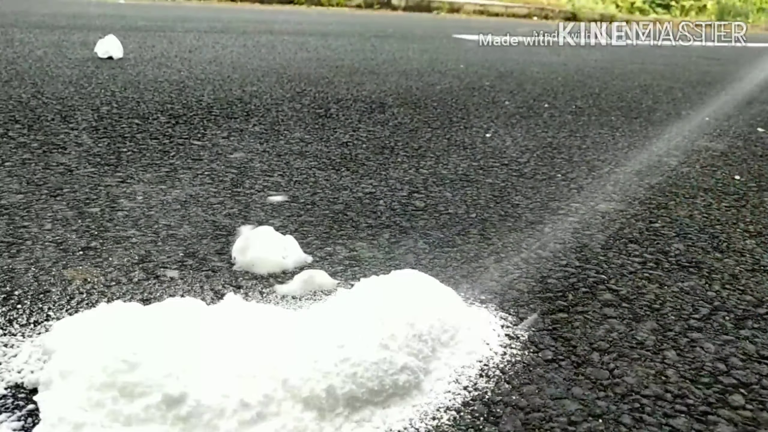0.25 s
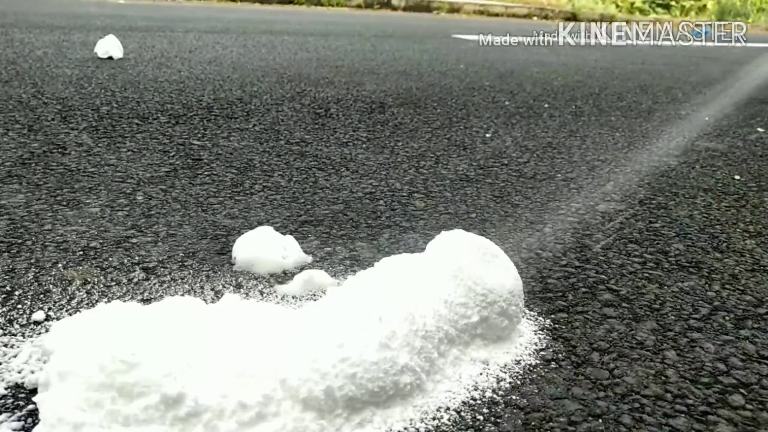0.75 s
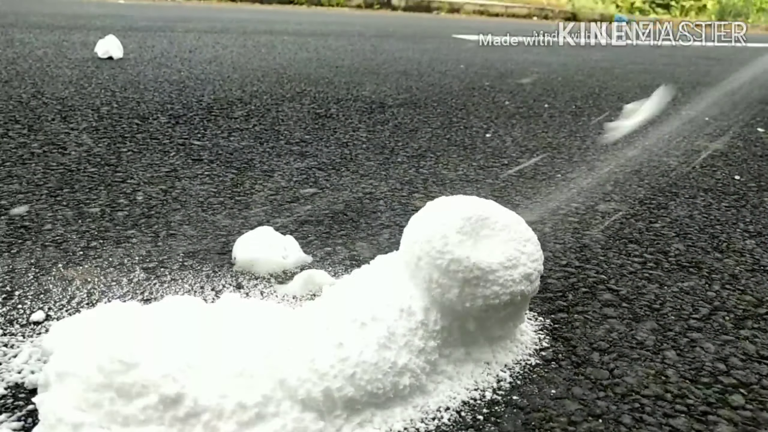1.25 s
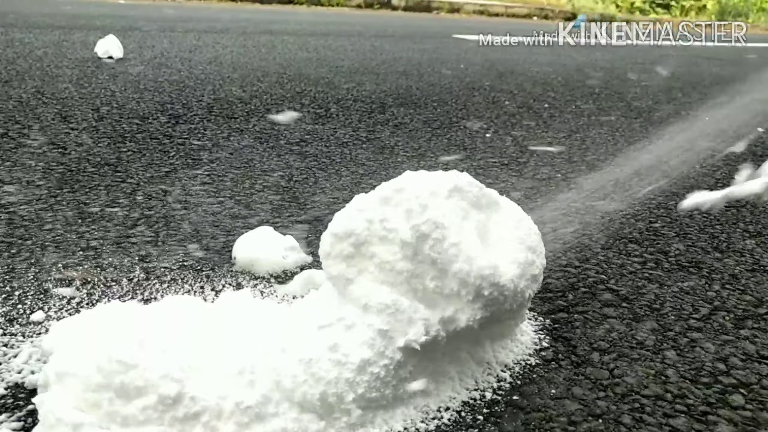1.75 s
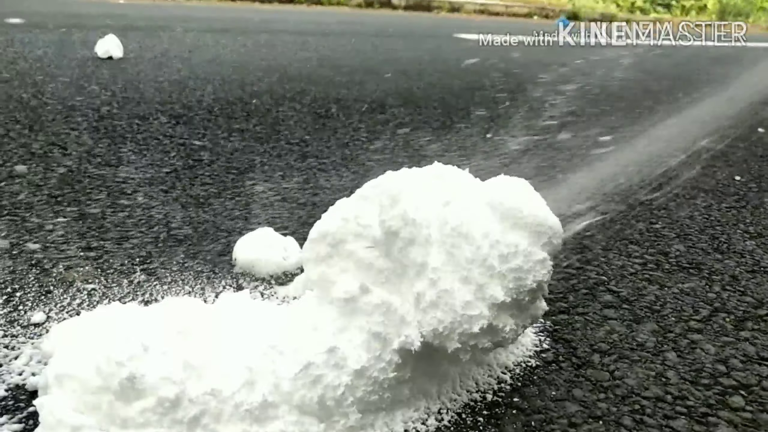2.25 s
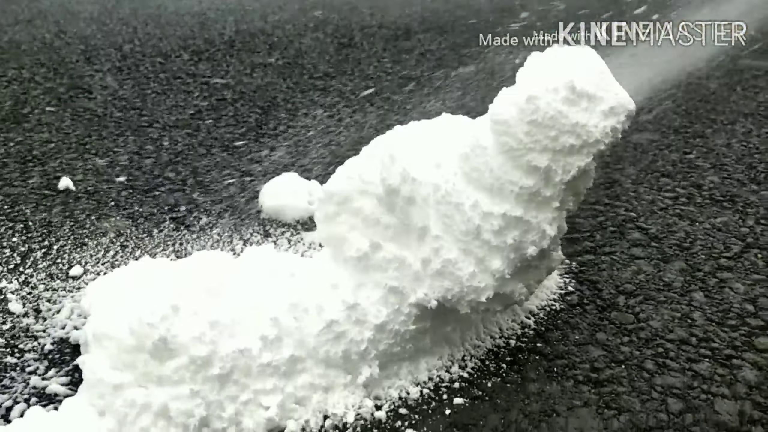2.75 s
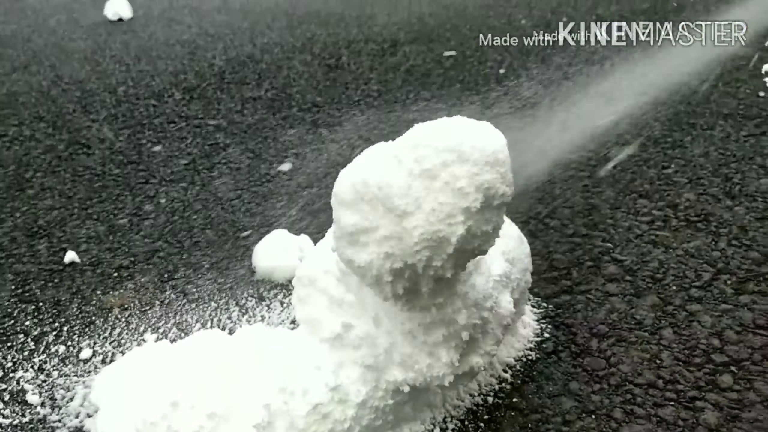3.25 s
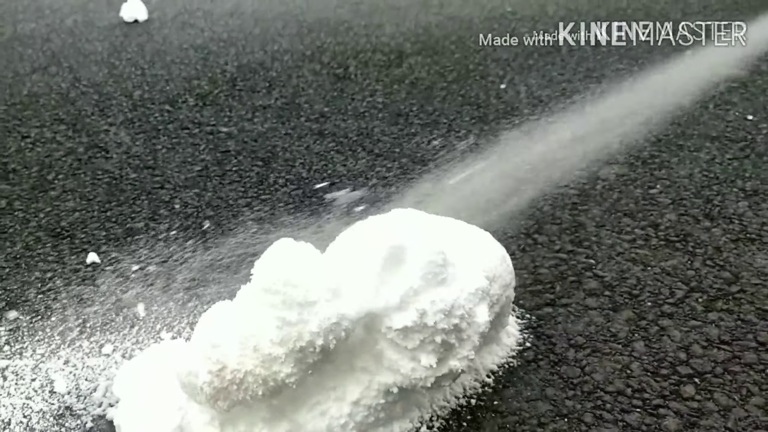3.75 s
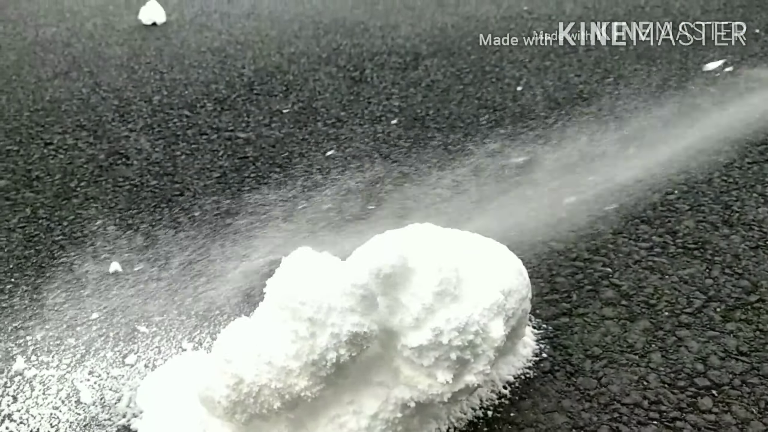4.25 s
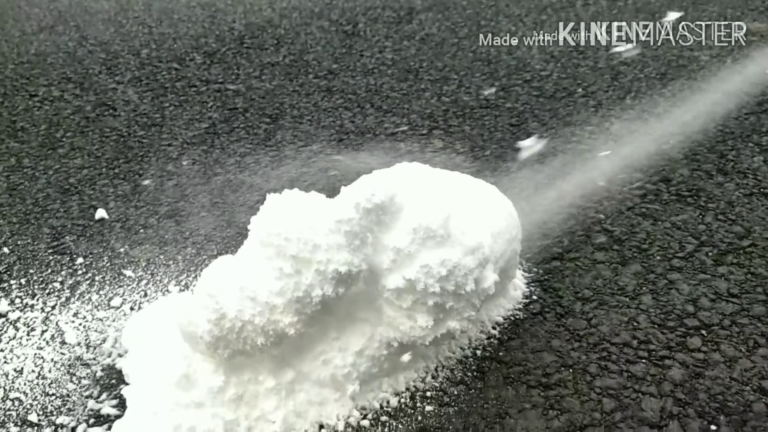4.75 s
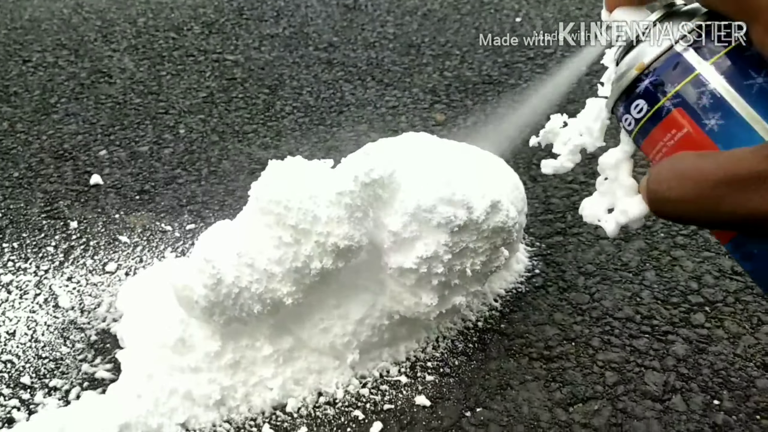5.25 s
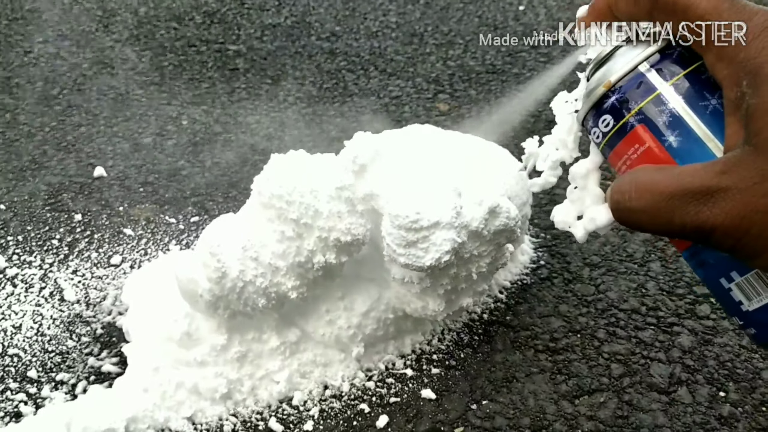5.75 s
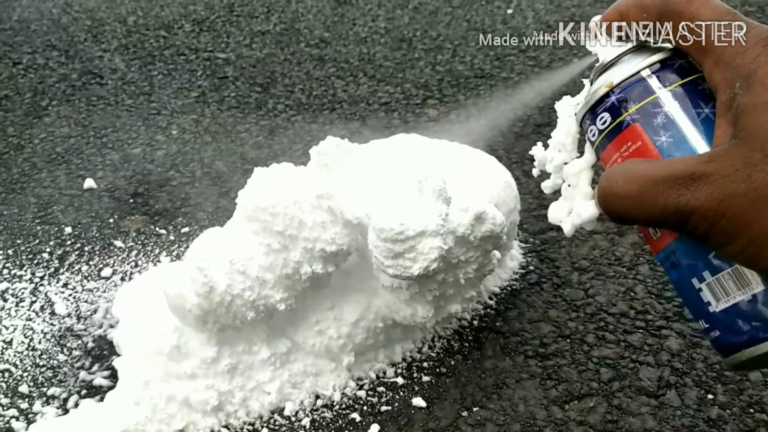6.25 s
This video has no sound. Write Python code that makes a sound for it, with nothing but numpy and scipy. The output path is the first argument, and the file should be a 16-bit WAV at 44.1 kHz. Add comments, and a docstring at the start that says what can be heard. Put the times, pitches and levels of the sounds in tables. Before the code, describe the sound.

A spray can hisses in one unbroken jet, close to a small microphone outdoors. From 0 to about 1.2 s the jet bores into foam: dense, grainy spatter and a hollow mid-range roar, with many quick gulps, strongest around 0.2-0.9 s. The hollow's ringing gradually drops in pitch. At about 1.5, 1.9 and 2.2 s the jet slips out briefly and the sound flares into bright hiss, between duller gurgles. From 2.4 s the nozzle hiss rises while the hollow weakens, gone shortly after 3 s; the spatter stops by about 3.4 s. Until the cut at 6.5 s a thin, sharp, nearly steady high hiss dominates, finely trembling, its hollow-toned colouring sliding slowly as the can comes nearer. Soft mist fizz lies beneath it, with quiet low rumble, airy wash and faint wind puffs throughout.

```python
"""An aerosol can sprays foam onto asphalt, close to a small microphone, in one unbroken jet.
At first the jet bores into the heap: droplets spatter, the deepening hollow roars, gulps and rings.
Around 3 s hollow and spatter fade; the can comes nearer and the thin nozzle hiss takes over, combed
by its echo off the road, with a soft mist fizz below. Low outdoor rumble and wash lie under it all.
Sources are noise with moving spectra; five resonant modes shape the hollow."""
import sys
import numpy as np
from scipy import signal
from scipy.fft import rfft, irfft
from scipy.io import wavfile
from scipy.ndimage import uniform_filter1d

SR = 44100
rng = np.random.default_rng(int(sys.argv[2]) if len(sys.argv) > 2 else 0)


def undo_db(level):
    """Turn decibels back into plain size, where 20 dB means ten times bigger."""
    steps = np.asarray(level, float) / 20
    return 10 ** steps


def waveform_to_disk(signal):
    """Save audio, clipped to [-1, 1], as 16-bit WAV at the path in sys.argv[1]."""
    frames = np.transpose(np.atleast_2d(signal))
    scaled = np.clip(frames, -1, 1) * 32767
    samples = np.round(scaled).astype(np.int16)
    wavfile.write(sys.argv[1], SR, samples)


N = 287022
SIZE, HOP = 1024, 256  # samples per noise frame and between frames
HZ = np.fft.rfftfreq(SIZE, 1 / SR)
TIME = np.arange(N // HOP + 9) * HOP / SR


def colour(points, hz=HZ):
    """A spectrum in dB at every bin, interpolated over log frequency."""
    f, value = np.transpose(points)
    return np.interp(np.log(hz + 1), np.log(f + 1), value)


def curves(rows):
    """The columns of a table at every frame, shaped (frames, 1)."""
    s, *columns = np.transpose(rows)
    return [np.interp(TIME, s, c)[:, None] for c in columns]


def bumps(rows):
    """Events as rounded swells at every frame."""
    return sum(height * np.exp(-abs((TIME[:, None] - s) / length) ** 3) for s, length, height in rows)


def evened(x):
    """Scales to rms 1."""
    return x / np.sqrt(np.mean(x ** 2) + 1e-20)


def smoothed(x, span, axis=-1):
    """Two running means in a row."""
    size = max(int(span), 1)
    return uniform_filter1d(uniform_filter1d(x, size, axis), size, axis)


def high_pass(edge_hz, steep):
    """Gain of a smooth low cut at every bin."""
    return 1 / np.sqrt(1 + (edge_hz / (HZ + 1)) ** steep)


def noise(shape, level_db, lo_hz, hi_hz, patchy_db, patch_s, patch_hz):
    """Noise of a moving spectrum; level_db sets the rms of band lo-hi before random patches."""
    a, b, patches = rng.standard_normal((3, len(TIME), len(HZ)))
    patches = smoothed(patches, patch_s * SR / HOP, axis=0)
    patches = evened(smoothed(patches, patch_hz / HZ[1], axis=1))
    shape = shape * np.ones_like(a)
    band = (HZ >= lo_hz) & (HZ < hi_hz)
    shape /= np.sqrt((shape[:, band] ** 2).sum(1, keepdims=True))
    z = (a + 1j * b) * shape * undo_db(level_db + patchy_db * patches)
    samples = signal.istft(z.T, nperseg=SIZE, noverlap=SIZE - HOP)[1][:N]
    return np.sqrt(1.5) * samples  # makes up for the overlap of independent frames


def flutter(depth_db, span_s):
    """Turbulence makes the level tremble; mean power stays 1."""
    tremble = evened(smoothed(rng.standard_normal(N), span_s * SR))
    return evened(undo_db(depth_db * tremble))


# The jet skips out of the hollow or, below zero, digs deeper.
# Each row: centre in seconds, half-length in seconds, extent from -1 to 1.
SLIPS = [(1.49, 0.046, 0.34), (1.915, 0.074, 0.74), (2.23, 0.058, 0.66), (2.63, 0.067, -.3),
         (3.22, .05, -0.048)]


def slips():
    """How far the jet is out of the hollow at every frame."""
    return bumps(SLIPS)


# The can moves over the road. Each row: time in seconds, extra path of the echo in ms,
# echo share 0-1, dark band under the hiss in Hz, its nominal depth in dB.
CAN = [(1.8, .74, .1, 6600, 0), (2.4, .752, .15, 6600, -1), (2.7, .74, .13, 6500, -6),
       (3.0, .717, .15, 6250, -4), (3.37, .796, .24, 5950, -7), (3.76, .925, .28, 5600, -11),
       (3.98, .907, .27, 5750, -10), (4.25, .876, .22, 5950, -10), (4.65, .887, .2, 5850, -12),
       (4.85, .927, .2, 5550, -10), (5.06, 1.04, .19, 5750, -9), (5.2, 1.097, .2, 4950, -11),
       (5.4, 1.15, .17, 4700, -10), (5.65, 1.228, .15, 4950, -4), (6.05, 1.227, .16, 5300, -6),
       (6.51, 1.265, .17, 5600, -5)]


def can():
    """Echo path, echo share, dark band and its depth at every frame."""
    return curves(CAN)


# The nozzle as heard past the heap.
# Each row: time in seconds, level in dB, lean towards the lower hump in dB.
NOZZLE = [(0, -30, 1), (.85, -30.5, 8.5), (1.25, -42, 5.5), (1.4, -40, -19), (1.6, -28, -8),
          (1.77, -30, -6), (2.07, -41, -23), (2.16, -27, 2), (2.35, -24, 2.5), (2.55, -17, 3),
          (3.1, -18.5, 2), (3.5, -19.5, 6), (3.9, -18.5, 1.5), (4.4, -19, -1.5), (4.9, -18, -4),
          (5.5, -16, -3), (5.9, -18, -5.5), (6.27, -17.5, -3), (6.51, -17.5, -4)]
# Hiss spectrum. Each row: frequency in Hz, relative density in dB per Hz.
HISS = [(3500, -40), (5000, -30), (6400, -11), (7600, 1.5), (8300, 2.5), (9400, -1.5), (10900, 1),
        (11900, -1), (13000, 0.5), (14200, -5.5), (15500, -14)]


def nozzle(jet):
    """Gas tearing out of the small hole: humped treble noise plus its echo off the road."""
    level_db, lower_db = curves(NOZZLE)
    level_db = level_db + 9.5 * slips()  # dB at a full slip
    dip, dark_hz = dark_band()
    # the top dulls behind foam, with the lean, and as the dark band slides below 5470 Hz
    top_db = 0.45 * (level_db + 15) - 0.04 * lower_db
    top_db = top_db + 19 * np.log2(np.minimum(dark_hz / 5470, 1))
    shape_db = colour(HISS) + lower_db * np.clip((10800 - HZ) / 2500, 0, 1)
    shape_db += top_db * np.clip((HZ - 10800) / 2700, 0, 1.6)
    shape = undo_db(shape_db) * road_echo() * dip * high_pass(1.17 * dark_hz, steep=14)
    sound = noise(shape, level_db, 9400, 11040, patchy_db=1.0, patch_s=.05, patch_hz=900)
    return sound * jet * flutter(depth_db=1.85, span_s=0.00034)


def road_echo():
    """Direct plus delayed sound comb the spectrum; the bounce is strongest in the high treble."""
    path_ms, share = can()[:2]
    beam = 1.6 * np.exp(-((HZ - 11000) / 3200) ** 2)
    rough = smoothed(smoothed(rng.standard_normal((len(TIME), len(HZ))), 40, axis=0), 20, axis=1)
    scatter = np.clip(1 + .3 * evened(rough), 0, 2)  # coarse asphalt reflects unevenly
    return abs(1 + beam * scatter * share * np.exp(-2j * np.pi * HZ * path_ms / 1000))


def dark_band():
    """Gain of the sliding dip, sharp at its core, ragged, with a wide skirt below; and where it lies."""
    dark_hz, depth_db = can()[2:]
    ragged = smoothed(smoothed(rng.standard_normal((len(TIME), len(HZ))), 14, axis=0), 6, axis=1)
    ragged = np.clip(1 + .4 * evened(ragged), 0, 2)
    core = np.exp(-((HZ - dark_hz) / 260) ** 2)
    skirt = np.exp(-((HZ - dark_hz + 600) / 750) ** 2)
    return undo_db(depth_db * (.85 * core + .4 * skirt) * ragged), dark_hz


# The jet churning the foam thins out as it climbs the heap.
# Each row: time in seconds, level in dB, tilt in dB per octave, low cut in Hz.
SPATTER = [(0, -15, -0.5, 900), (.55, -22.5, -1.5, 1140), (1.2, -19.5, -1.5, 1190), (1.75, -19, -2.5, 1310),
           (2.08, -18, -5.5, 1360), (2.32, -17.5, -3, 1170), (2.65, -22.5, 3, 1630),
           (2.85, -25.5, -2, 1910), (3.08, -32.5, -4, 2100), (3.22, -25.5, 5, 2170), (3.32, -30, -2, 2200)]
# Spatter spectrum. Each row: frequency in Hz, relative density in dB per Hz.
SPATTER_COLOUR = [(300, 4), (1500, -0.5), (2900, -1), (3600, -0.5), (5000, -5), (6500, -8.5), (8600, -9.5),
                  (15500, -21.5)]


def spatter(jet):
    """A dense rain of droplets into the foam: broad noise, grainy at the millisecond scale."""
    level_db, tilt_db, lowest_hz = curves(SPATTER)
    slip = slips()
    clearing_db = 70 * np.maximum(TIME[:, None] - 3.3, 0)  # the jet clears the heap, 70 dB per second
    level_db = level_db - 1.5 * slip - clearing_db
    tilt_db = tilt_db + 12 * slip
    shape_db = colour(SPATTER_COLOUR) + tilt_db * np.log2(HZ / 3200 + 0.014)
    shape = undo_db(shape_db) * high_pass(lowest_hz, steep=8.5)
    sound = noise(shape, level_db, 2000, 5000, patchy_db=2.1, patch_s=.06, patch_hz=220)
    return sound * jet * flutter(depth_db=3.0, span_s=0.0012)


# The hollow deepens. Each row: time in seconds, blow in dB, lowest mode in Hz,
# step between modes in Hz, where the jet drives it in Hz, reach of the drive in octaves.
HOLLOW = [(0, -27, 840, 297, 1190, 2.1), (.2, -28, 838, 320, 835, 0.41), (.45, -22.5, 813, 338, 860, 0.52),
          (.68, -21, 670, 400, 660, 1.3), (.92, -18.5, 644, 415, 900, 0.89),
          (1.15, -18.5, 635, 346, 1120, 0.94), (1.4, -22.5, 602, 281, 990, 0.6),
          (1.7, -18, 597, 289, 900, 0.78), (1.84, -18.5, 570, 298, 960, .8),
          (2.0, -25.5, 524, 298, 1500, 1.2), (2.1, -19.5, 533, 290, 900, 0.97),
          (2.35, -26.5, 518, 292, 1230, 0.64), (2.55, -32, 474, 284, 1710, 0.27),
          (2.75, -27.5, 480, 281, 1600, 0.71), (2.92, -34, 470, 277, 1620, 0.55),
          (3.1, -65, 467, 280, 1900, .5)]
# Mode widths in Hz, lowest mode first, before the flanks are steepened.
MODE_WIDTHS_HZ = [105, 100, 115, 130, 150]
# Mode levels in dB, lowest mode first, before the flanks are steepened.
MODE_DB = [0.79, 0.5, -1.1, 0.51, 1.6]
# Gulps of gas bursting in the hollow. Each row: start in seconds,
# strength in dB (the peak lies 3 dB lower), time from start to peak in ms.
GULPS = [(0.171, -16.5, 11), (0.21, -1.5, 2.1), (0.25, -16.5, 26), (0.318, -2.5, 3.4), (0.396, -6, 3.1),
         (0.436, -8, 4.7), (0.492, -13.5, 14), (0.563, -7.5, 4.1), (0.614, -12, 5.9), (0.676, -10, 6.7),
         (0.752, -15, 26), (0.884, -9, 5.9), (1.172, -19, 3.7), (1.251, -9.5, 8), (1.344, -13, 20),
         (1.723, -8, 24), (1.783, -19, 10), (1.959, -21, 7.6), (2.414, -21, 9.0), (2.584, -15, 3.8),
         (2.646, -23, 11), (2.715, -16, 5.3)]


def hollow(jet):
    """The jet gurgles in the hole it bores: trembling noise and gulps through five evenly spaced modes."""
    level_db, lowest_hz, step_hz, driven_hz, reach = curves(HOLLOW)
    leaving_db = 150 * np.maximum(TIME[:, None] - 3.07, 0)  # the jet leaves the hole, 150 dB per second
    level_db = level_db - 14 * slips() - leaving_db
    modes = 0
    for k, (width, db) in enumerate(zip(MODE_WIDTHS_HZ, MODE_DB)):
        hz = lowest_hz + k * step_hz
        fade_db = np.maximum(-10 * (np.log2(hz / driven_hz) / reach) ** 2, -30)
        modes = modes + undo_db(db + fade_db) / (1 + 2j * (HZ - hz) / width)  # neighbours cancel in between
    # the power steepens the flanks and keeps the valleys dark
    shape = abs(modes) ** 1.4 * high_pass(0.79 * lowest_hz, steep=4.8)
    ring = noise(shape, 0, 480, 1800, patchy_db=2.4, patch_s=.03, patch_hz=200)
    t = np.arange(N) / SR
    blow_power = undo_db(2 * np.interp(t, TIME, level_db[:, 0])) * flutter(depth_db=1.5, span_s=0.0098) ** 2
    for s, strength_db, ms in GULPS:
        near = slice(round((s - .03) * SR), round((s + .08) * SR))
        gulp = np.exp(-((t[near] - s - ms / 1000) / (ms / 1000)) ** 2)
        blow_power[near] += .5 * undo_db(2 * strength_db) * gulp
    return jet * ring * np.sqrt(blow_power)


# Fine mist near the microphone. Each row: time in seconds, level in dB, tilt in dB per octave.
MIST = [(2.6, -27, 8), (3.3, -31.5, -3), (4.0, -31.5, -2.5), (5.2, -30.5, -2.5), (5.9, -30.5, -2.5),
        (6.51, -26, -1.5)]
# Mist spectrum. Each row: frequency in Hz, relative density in dB per Hz.
MIST_COLOUR = [(180, -21), (300, -16.5), (502, -11.5), (720, -4), (896, -6), (1460, -1), (2210, -0.5),
               (3500, 1.5), (5160, 1), (6500, 0), (8450, -13), (14300, -120)]


def mist(jet):
    """Drifting fine droplets: a soft, even fizz under the hiss."""
    level_db, tilt_db = curves(MIST)
    shape_db = colour(MIST_COLOUR) + tilt_db * np.log2(HZ / 1500 + .02)
    shape = undo_db(shape_db) * dark_band()[0]
    return jet * noise(shape, level_db, 500, 4600, patchy_db=1.5, patch_s=.03, patch_hz=250)


# Outdoors. Each row: time in seconds, low rumble in dB, wash above it in dB.
OUTDOORS = [(0, -32, -41), (1.3, -40.5, -50), (2.05, -48.5, -48), (2.9, -45, -48.5), (3.9, -36, -44),
            (4.6, -34.5, -45), (5.5, -37, -40), (6.51, -40, -37.5)]
# Rumble spectrum. Each row: frequency in Hz, relative density in dB per Hz.
RUMBLE = [(15, -40), (30, -33), (45, 0), (59, 4), (75, 0), (110, -6), (200, -20.5), (300, -32)]
# Wash spectrum. Each row: frequency in Hz, relative density in dB per Hz.
WASH = [(60, -9), (120, 2), (200, -1), (300, -2), (400, 0.5), (550, -6), (1000, -4.5), (3000, -36)]
# Puffs of wind. Each row: centre in seconds, half-length in seconds, nominal rise in dB.
GUSTS = [(.7, 0.082, 8), (1.58, 0.14, 13), (2.25, 0.046, 12), (2.5, 0.079, 9.5), (4.82, 0.044, 9.5),
         (6.25, 0.11, 7)]


def outdoors():
    """Lumpy low rumble and a soft wash above it; both swell in the puffs of wind."""
    rumble_db, wash_db = curves(OUTDOORS)
    gust_db = bumps(GUSTS)
    gain = undo_db(colour(RUMBLE, np.fft.rfftfreq(N, 1 / SR)))
    low = irfft(rfft(rng.standard_normal(N)) * gain, N)
    low_db = smoothed((rumble_db + gust_db)[:, 0], 5.8)
    rumble = evened(low) * undo_db(np.interp(np.arange(N) / SR, TIME, low_db))
    # from 4.7 s the wash deepens over one second, as the can blows air closer by
    tilt_db = -2.5 * np.clip(TIME[:, None] - 4.7, 0, 1) * np.log2(np.clip(HZ, 120, 600) / 280)
    wash = noise(undo_db(colour(WASH) + tilt_db), wash_db + 0.14 * gust_db, 180, 420,
                 patchy_db=-0.1, patch_s=0.021, patch_hz=150)
    return rumble + wash


def scene():
    """The jet's unsteadiness is shared by nozzle, droplets, mist and hollow."""
    jet = flutter(depth_db=0.7, span_s=0.011)
    return (nozzle(jet) + spatter(jet) + hollow(jet) + mist(jet) + outdoors())[None]


def band_limit(x):
    """A steep low-pass at the top of the band."""
    return signal.sosfilt(signal.butter(12, 15520, fs=SR, output="sos"), x)


def record(dry):
    """The microphone cuts the deepest bass, gain control evens the level, a soft limit rounds the peaks."""
    heard = signal.sosfilt(signal.butter(3, 38, "highpass", fs=SR, output="sos"), dry)
    hold = np.exp(-1 / (.011 * SR))  # 11 ms; the control reacts late, so a dip follows each burst
    power = signal.lfilter([1 - hold], [1, -hold], heard ** 2, zi=[[hold * undo_db(-18.0)]])[0]
    power_db = 10 * np.log10(power + 1e-9)
    steady = heard / undo_db(.6 * (power_db + 14.2))
    ceiling = .85
    drive = steady / ceiling
    limited = ceiling * np.tanh(drive * (1 + 0.043 * drive ** 2))
    return band_limit(limited)


dry = scene()
out = record(dry)
waveform_to_disk(out)
```